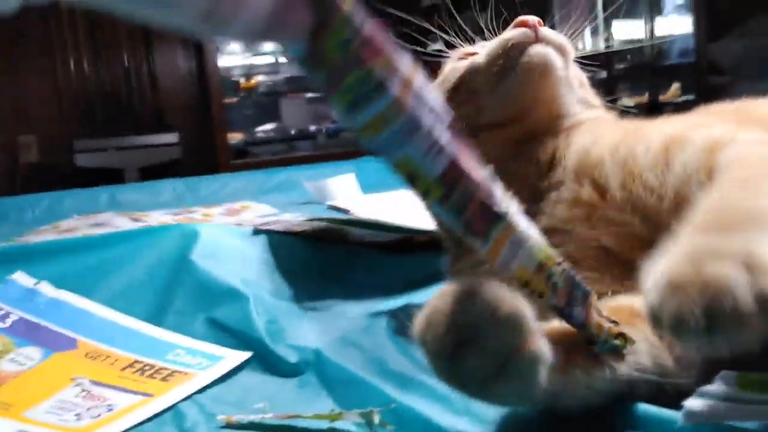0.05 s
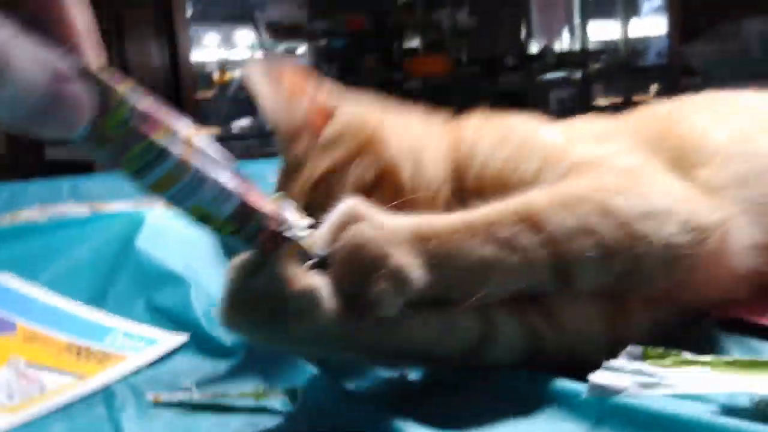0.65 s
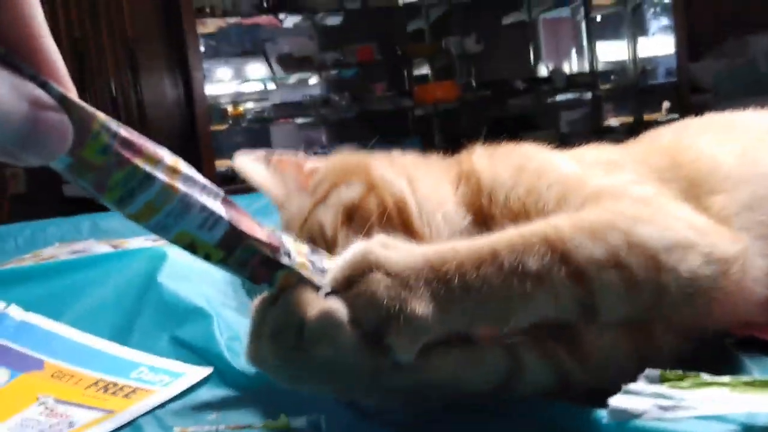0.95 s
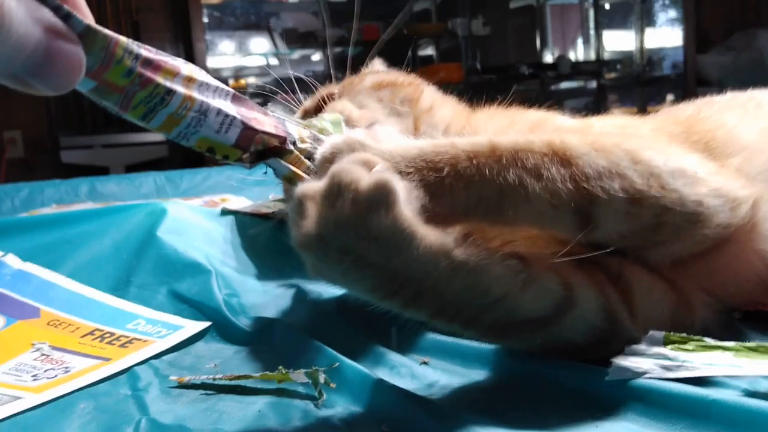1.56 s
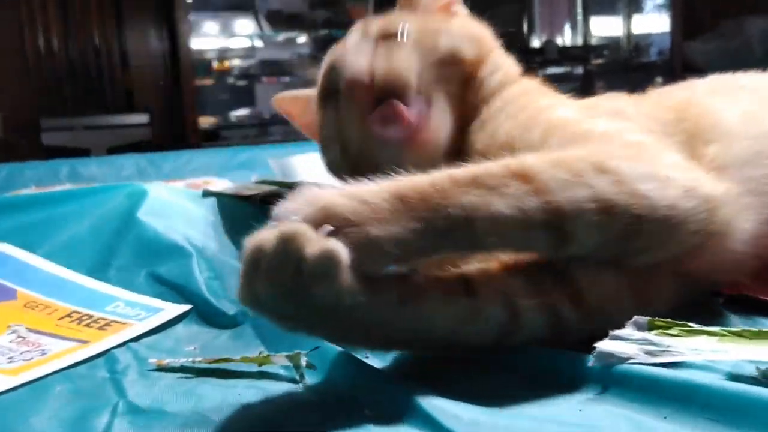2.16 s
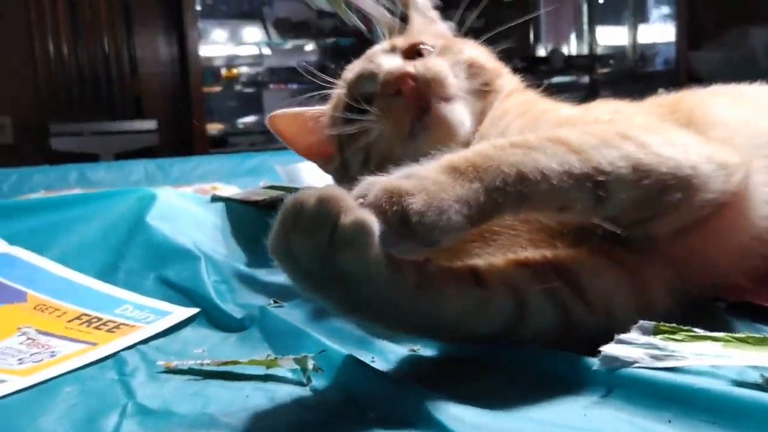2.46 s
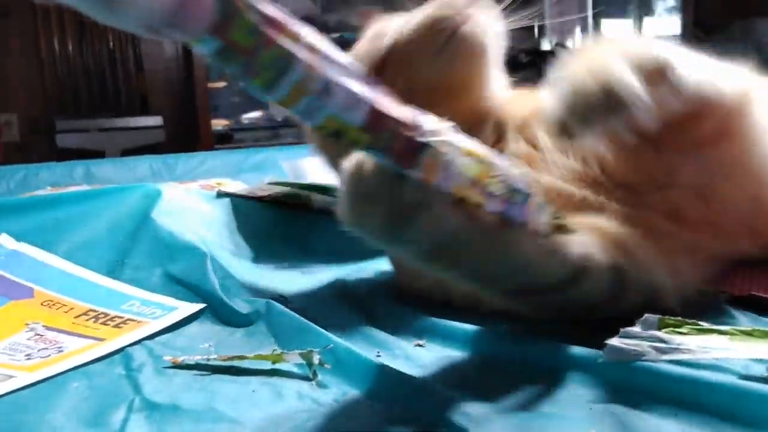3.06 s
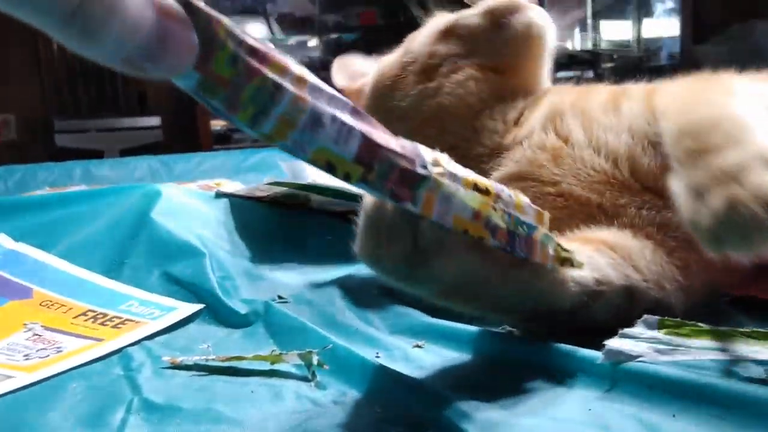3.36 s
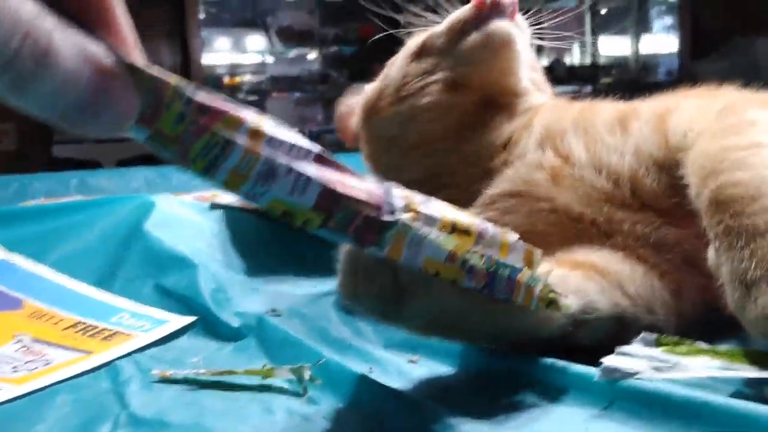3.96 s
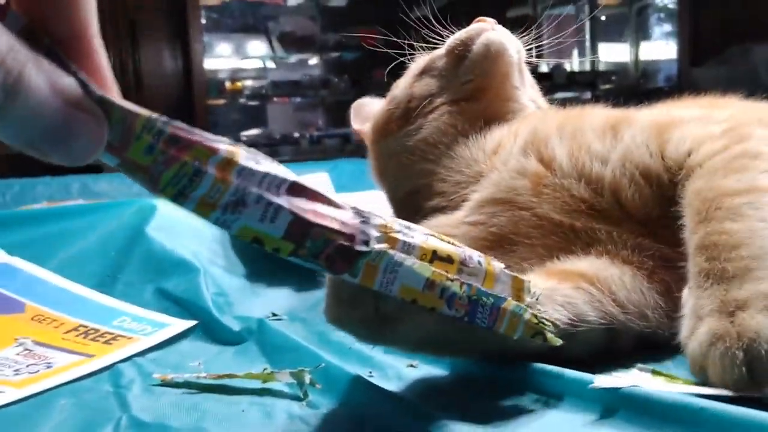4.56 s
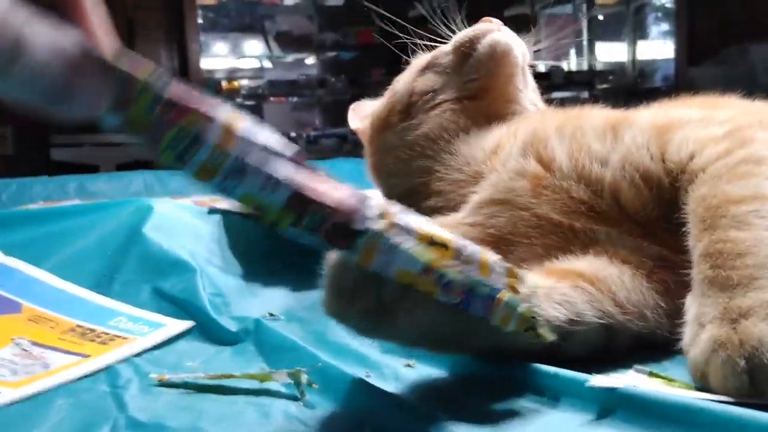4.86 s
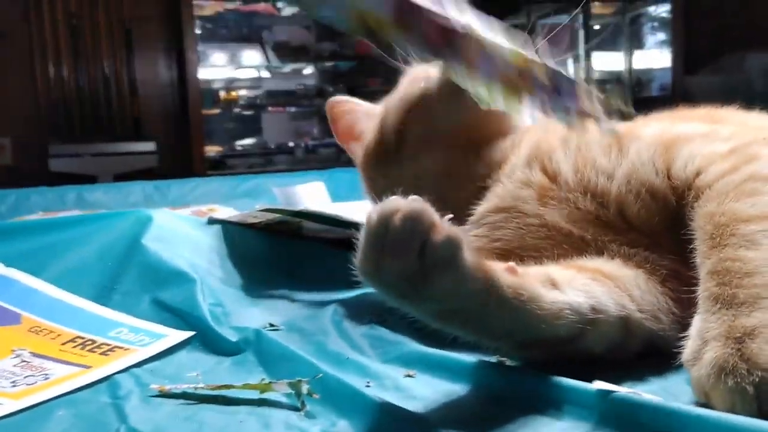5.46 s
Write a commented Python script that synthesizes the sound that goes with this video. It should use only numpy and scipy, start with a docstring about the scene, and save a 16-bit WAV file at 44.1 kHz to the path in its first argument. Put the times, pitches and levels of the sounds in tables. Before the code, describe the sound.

A kitten plays with a rolled newspaper close to the microphone, slightly left, in a furnished room with little echo. A fan drones quietly farther back throughout. At about 0.2 seconds, paws give three quick, soft, hollow knocks, and the paper starts rustling and crinkling in uneven strokes, with snaps at 0.3 and 0.5. A tooth briefly rasps over an edge at 0.7. The loudest snap comes at 1.1 seconds, followed by dense crackling and small dry tocks as teeth and claws dent the roll, busy until about 2.2. After a lull, softer swipes and a few cracks come around 2.7 to 3.2. Then there is only light sliding and faint, scattered ticking. The rustle builds again near 4.8 and ends in a second hard snap at 5.0. The whole sound dips briefly after both hard snaps. Faint rustling continues to the end, at about 5.7 seconds.

```python
"""A furnished room, with a camera's stereo microphone close to a kitten at a rolled newspaper.
As it paws and bites, the sheets slide, crinkle and snap; paws knock the hollow roll, teeth and claws
dent its wall, and one tooth rasps over an edge. Farther back a fan drones. The camera's gain control
ducks after the two hardest snaps, and its stereo widener feeds each channel, late and inverted,
into the other."""
import sys
import numpy as np
from scipy import signal
from scipy.fft import rfft, irfft, next_fast_len
from scipy.io import wavfile
from scipy.ndimage import uniform_filter1d, minimum_filter1d, map_coordinates

SR = 44100
rng = np.random.default_rng(int(sys.argv[2]) if len(sys.argv) > 2 else 0)


def put_to_file(sound):
    """Save the sound as 16-bit audio at rate SR, in the file named by the first command-line argument."""
    columns = np.atleast_2d(sound).T  # one column per channel
    safe = np.clip(columns, -1, 1)
    whole_steps = np.round(safe * 32767)
    wavfile.write(sys.argv[1], SR, whole_steps.astype(np.int16))


N = 251370
TOP_HZ = 14350  # the camera's band limit


def amp(db):
    """Decibels to gain."""
    return 10 ** (np.asarray(db) / 20)


def unit(x):
    """x at rms 1."""
    return x / np.sqrt(np.mean(x ** 2) + 1e-20)


def along(points, hz):
    """(f/Hz, value) points joined on a log frequency axis."""
    freqs, values = np.transpose(points)
    return np.interp(np.log(hz + 1), np.log(freqs + 1), values)


def wobble(rate):
    """A smooth random curve, rate knots a second."""
    return map_coordinates(rng.standard_normal(N // 100), [np.arange(N) * rate / SR], mode="wrap")


def filtered(x, response):
    """x through a filter given as a function of frequency."""
    n = x.shape[-1]
    padded = next_fast_len(2 * n)
    return irfft(rfft(x, padded) * response(np.fft.rfftfreq(padded, 1 / SR)), padded)[..., :n]


def coloured(x, spectrum):
    """x shaped by (f/Hz, level/dB) points, at rms 1."""
    return unit(filtered(x, lambda hz: amp(along(spectrum, hz))))


def resonance(hz, centre, q):
    """Response of one damped mode."""
    return 1j * hz * centre / q / (centre ** 2 - hz ** 2 + 1j * hz * centre / q)


def add(track, start, sound):
    """Mix a sound into the track from start seconds on."""
    part = track[:, max(round(start * SR), 0):][:, :sound.shape[-1]]
    part += sound[..., :part.shape[-1]]


def leaning(x, left_db):
    """A pair with its left channel left_db above its right."""
    return x * amp(np.array([[1], [-1]]) * left_db / 2)


def motor(pitch_hz=123, level_db=-47.5):
    """The fan's motor hums the steady core of its strongest tone."""
    t = np.arange(N) / SR
    phases = rng.uniform(0, 2 * np.pi, (2, 1))
    return np.sqrt(2) * amp(level_db) * np.sin(2 * np.pi * pitch_hz * t + phases)


def fan(air_db=-45.5):
    """Far off: rushing air and unsteady motor tones, diffuse, but more alike at both ports in the bass."""
    # rushing air: f/Hz, level/dB
    air_spectrum = [(20, -29), (32, -26), (55, 3), (100, -5), (160, -2.5), (300, -0.5), (600, -8),
                    (1100, -10.5), (1600, -17), (2200, -15.5), (3000, -30), (4200, -33), (6500, -44.5),
                    (14000, -43)]
    # fan tones: f/Hz, level/dB, half-width/Hz
    tones = [(56.3, -67, 3), (126.3, -51, 9.3), (187.1, -54, 2.2), (232.5, -55, 13), (246.7, -55, 5.7),
             (305.7, -64.5, 2.2), (430.6, -54, 14), (565, -66, 7.8), (599, -67, 5.4), (659.6, -64.5, 10),
             (713, -63, 23)]
    # width of the room sound at the microphone ports: f/Hz, side minus mid/dB
    spread = [(60, -3), (200, -11.5), (400, -9.5), (750, -3), (1300, 0)]
    # its balance: f/Hz, left minus right/dB
    balance = [(60, 0.5), (200, -1), (650, -4.5), (1300, 7), (3000, 4), (10000, -2)]
    # the drone as heard, dipping and recovering, probably partly from the gain control: t/s, level/dB
    heard_level = [(0, -3), (.4, -2), (1.1, -2.5), (1.35, 0.5), (1.6, -1), (1.8, -3), (2, -5.5), (2.3, -4),
                   (2.6, -2.5), (4.9, -3), (5.3, -2.5), (5.7, -3.5)]

    def tone_peaks(f):
        return sum(amp(db) / np.sqrt(width) / (1 + ((f - hz) / width) ** 2) for hz, db, width in tones)

    air = amp(air_db) * coloured(rng.standard_normal((2, N)), air_spectrum)
    hum = np.sqrt(SR / np.pi) * filtered(rng.standard_normal((2, N)), tone_peaks)
    mid, side = air + hum + motor()
    side = filtered(side, lambda hz: amp(along(spread, hz)))
    pair = filtered(np.array([mid + side, mid - side]), lambda hz: leaning(0.9, along(balance, hz)))
    heard_db = np.interp(np.arange(N) / SR, *np.transpose(heard_level))
    return pair * amp(heard_db)


def pawing(attack_s=0.0087, build_db=5):
    """Each stroke takes hold, builds and lets go: amplitudes of sliding on fur, scraping and crushing."""
    # pulls and swipes on the roll: t/s, length/s, release t60/s, slide/dB, crush/dB,
    # share on claws and paper edges rather than fur/0-1
    strokes = [(0.114, 0.085, 0.26, -57.5, -59, .5), (0.197, 0.1, 0.43, -47, -52, 0.2),
               (0.304, 0.059, 0.32, -47, -57, 0.26), (0.438, 0.14, 0.55, -50, -56, 0),
               (0.651, 0.028, 0.3, -47.5, -60, 0.6), (0.735, 0.017, 0.5, -57, -49, 0.5),
               (0.778, 0.034, 0.14, -48, -55, 0.74), (0.815, 0.075, 0.68, -51.5, -58.5, 0.26),
               (0.965, 0.25, 0.12, -47, -52.5, 0.2), (1.111, 0.024, 0.19, -35.5, -43, 0.5),
               (1.208, 0.02, 0.29, -40, -53, 0.2), (1.246, 0.32, 0.28, -51.5, -57.5, 0.55),
               (1.43, 0.062, 0.17, -43, -57.5, 0.77), (1.503, 0.042, 0.033, -39, -46, 0.7),
               (1.608, 0.11, 0.033, -39.5, -50.5, 0.65), (1.73, 0.02, 0.71, -69, -66, 0.9),
               (1.892, 0.031, 0.24, -43, -51.5, 0.36), (1.966, 0.12, 0.28, -49, -53.5, 0.33),
               (2.151, 0.033, 0.14, -52, -56, 0.5), (2.41, 0.027, 0.38, -60, -64, 0.2),
               (2.548, 0.24, .3, -57.5, -63, 0.5), (2.763, 0.093, 0.28, -49, -74, 0.25),
               (2.913, 0.19, 0.4, -49.5, -67, 0.1), (3.156, 0.056, 0.62, -51.5, -79, 0.25),
               (3.787, 0.03, 0.92, -55.5, -67, 0.2), (3.973, 0.25, 0.31, -61, -76, 0.7),
               (4.225, 0.078, 0.22, -54.5, -64, 0.5), (4.62, 0.08, 0.32, -60, -72, .4),
               (4.79, 0.073, .3, -58.5, -78, 0.1), (4.895, 0.17, 0.22, -50.5, -60.5, 0.3),
               (5.14, 0.21, .3, -68, -66, 0.5), (5.376, 0.33, 0.33, -61.5, -66, 0.4),
               (5.456, 0.012, 0.085, -54, -73, 0.5)]

    def powers(slide_db, crush_db, edge):
        return np.array([[1 - edge], [edge], [1]]) * amp([[slide_db], [slide_db], [crush_db]]) ** 2

    t = np.arange(N) / SR
    power = powers(slide_db=-66, crush_db=-67.5, edge=0.27)  # the roll never lies quite still
    for start, length, t60, slide_db, crush_db, edge in strokes:
        grip = np.clip((t - start) / attack_s, 0, 1)
        rise_db = build_db * (np.clip((t - start) / length, 0, 1) - 1)
        release_db = -60 * np.clip((t - start - length) / t60, 0, 2)
        force = grip * amp(rise_db + release_db)
        power = power + powers(slide_db, crush_db, edge) * force ** 2
    return np.sqrt(power)


def crackle(per_s, spread_db, smooth):
    """Fibres letting go: tiny impulses of unequal size over smooth friction."""
    sizes = amp(spread_db * np.minimum(rng.standard_exponential(N), 2))
    slips = (rng.random(N) < per_s / SR) * sizes * rng.uniform(-1.25, 1, (2, N))
    return unit(slips) + smooth * rng.standard_normal((2, N))


def catching(depth_db):
    """Edges, claws and teeth catch and let go: a stuttering gain."""
    return unit(amp(depth_db * np.clip(wobble(150), -2, 2)))


def flexing(x, depth_db):
    """The bending sheet favours ever-changing bands."""
    bands = signal.stft(x, nperseg=256)[2]
    field = uniform_filter1d(rng.standard_normal(bands.shape[1:]), size=9, axis=0)  # over frequency
    field = uniform_filter1d(field, size=12, axis=1)  # over time
    gains = amp(depth_db * np.clip(unit(field), -2, 2))
    return signal.istft(bands * gains, nperseg=256)[1][:, :N]


def rustle(fur, edges, squeeze, slide_gain_db=-4, crush_gain_db=-1):
    """Sliding sheets hiss finely; squeezed ones crunch lower and coarser. Both move in small jerks."""
    # paper sliding on fur: f/Hz, level/dB
    swish_spectrum = [(300, -34), (1500, 8.5), (3300, -2), (6000, -7), (7800, 5.5), (9500, 8), (11000, 5.5),
                      (12500, -2), (14000, -1.5)]
    # paper scraping on claws and edges: f/Hz, level/dB
    scrape_spectrum = [(300, -61), (1500, -6), (3300, -12), (6000, -0.5), (7800, 5), (11000, -11.5),
                       (12500, 5), (14000, 1)]
    # squeezed sheets: f/Hz, level/dB
    crush_spectrum = [(100, -41), (400, 1.5), (1000, -2.5), (1600, 3.5), (2400, -5), (3400, -1),
                      (5000, -9.5), (7000, -9), (14000, -38)]
    jerks_db = 0.64 * wobble(50)
    scrape_grit = crackle(per_s=800, spread_db=4.5, smooth=0.4)
    crush_grit = crackle(per_s=1200, spread_db=3.5, smooth=0.9)
    catches = catching(depth_db=2.5)
    swish = fur * coloured(rng.standard_normal((2, N)), swish_spectrum)  # fur does not catch
    scrape = edges * catches * coloured(scrape_grit, scrape_spectrum)
    slide = amp(slide_gain_db + jerks_db) * (swish + scrape)
    crush = squeeze * amp(crush_gain_db + jerks_db) * catches * coloured(crush_grit, crush_spectrum)
    return flexing(leaning(slide, left_db=3.5) + crush, depth_db=2.5)


def buckling(creases, rise_s=0.00056, fall_s=0.00023, shiver_db=-25, shiver_t60=0.04):
    """Each crease buckles in about a millisecond: a crack, a bite and a pop, then the sheet shivers."""
    # bright crack of the crease: f/Hz, level/dB
    crack_spectrum = [(1000, -9), (3300, -2), (5600, -8.5), (7600, 7.5), (11000, 7), (13500, 1)]
    # bite of the stiff fold: f/Hz, level/dB
    bite_spectrum = [(1200, -32), (2400, -8.5), (3200, 2), (4000, -0.5), (5500, -12), (9000, -7.5)]
    # pop of the sheet: f/Hz, level/dB
    pop_spectrum = [(200, 9), (900, 18), (1600, 11.5), (2200, 21.5), (3300, -25), (6000, -26), (14000, -33)]
    out = np.zeros((2, N))
    t = np.arange(-SR // 200, SR // 25) / SR
    after = np.maximum(t, 0)
    shiver = amp(shiver_db - 60 * after / shiver_t60)
    burst = np.exp(np.minimum(t, 0) / rise_s) * (np.exp(-after / fall_s) + shiver)
    for start, db, pitch_hz, pop_db, bite_db in creases:
        tear = burst * rng.standard_normal((2, len(t)))
        fold, push = burst * rng.standard_normal((2, len(t)))  # the lower parts reach both ports alike
        pitched = filtered(tear, lambda hz: resonance(hz, pitch_hz, q=1.3) * (hz < TOP_HZ))
        crack = coloured(pitched, crack_spectrum)
        bite = amp(bite_db) * coloured(fold, bite_spectrum)
        pop = amp(pop_db) * coloured(push, pop_spectrum)
        snap = crack + bite + pop
        add(out, start + t[0], amp(db) * snap / abs(snap).max(axis=1, keepdims=True))
    return leaning(out, left_db=4)


def crinkles(slide, per_s=30, level_db=-44, at_slide_db=-45.5, growth=0.87, scatter_db=2):
    """Small creases give way at random, louder as the paper slides harder."""
    gap_a, gap_b, strength, pitch, pop = rng.standard_normal((512, 5)).T
    times = np.cumsum((gap_a ** 2 + gap_b ** 2) / 2) / per_s  # exponential waits
    slide_db = 20 * np.log10(np.interp(times, np.arange(N) / SR, slide))
    db = level_db + growth * (slide_db - at_slide_db) + scatter_db * strength
    pitch_hz = 8550 * 2 ** (0.28 * pitch)
    pop_db = -2 + scatter_db * pop
    bite_db = np.full_like(db, -21.5)
    creases = np.column_stack([times, db, pitch_hz, pop_db, bite_db])
    return buckling(creases[times < N / SR])


def knocks(attack_s=0.00077, side_db=-9):
    """A soft paw sets the hollow roll ringing for a moment."""
    # paws landing: t/s, level/dB, stiffness of the spot/pitch ratio
    landings = [(.1612, -26, 1.02), (.189, -31.5, 1.06), (.2105, -29, 0.97)]
    # modes of the roll: f/Hz, level/dB, t60/s
    roll_modes = [(169, 7.5, 0.023), (304, -1, 0.038), (435, 1.5, 0.064), (580, -5.5, 0.049),
                  (910, -10, 0.035), (1100, -13, 0.025)]
    out = np.zeros((2, N))
    t = np.arange(SR // 8) / SR
    hz, mode_db, t60 = np.transpose(roll_modes)[:, :, None]
    onset = 1 - np.exp(-t / attack_s)
    for start, db, stiffness in landings:
        phases = rng.uniform(0, 2 * np.pi, (2, len(roll_modes), 1))
        decay = amp(mode_db - 60 * t * stiffness / t60)
        modes = decay * np.sin(2 * np.pi * hz * stiffness * t + phases)
        mid, side = modes.sum(axis=1) * onset * amp([[0], [side_db]])
        add(out, start, amp(db) * np.array([mid + side, mid - side]) / 2)
    return out


def snaps():
    """The big creases give way, close to the microphone."""
    # big creases: t/s, level/dB, f/Hz, pop against crack/dB, bite against crack/dB
    creases = [(.1615, -28, 9400, 10, 10), (.1892, -29, 9300, 14, 7), (.2088, -34.5, 8000, 3, 21),
               (.3196, -23, 10500, 3.5, 11), (.5404, -24, 9400, -4, -16), (.667, -34, 7500, -6, -8),
               (.678, -39, 8500, -9, -9), (.698, -43, 9000, -11, -13), (.7142, -34, 8300, -9, -21),
               (.7365, -42, 7000, 8, 2), (.809, -34, 9000, -7, -5), (.816, -41, 8500, -3, -7),
               (1.08, -31, 7500, -3, -16), (1.091, -30, 11500, 1, -19), (1.1064, -10, 11800, -10, -7.5),
               (1.12, -29, 8500, -13, -10), (1.1334, -20, 7600, -7, -2), (1.139, -26, 8500, -11, -6),
               (1.157, -27, 7500, -4, 2), (1.165, -34, 8500, -20, -9), (1.1796, -21.5, 10000, -13, -20),
               (1.188, -26, 10000, -8, -17), (1.331, -38, 7000, -3, 2), (1.474, -36, 8500, -16, -9),
               (1.4878, -24.5, 8500, -9, -5), (1.515, -26.5, 8500, 5, -12), (1.527, -30, 8500, 11, -8),
               (1.5385, -24, 8150, -16, -7), (1.543, -40, 8000, -2, -8), (1.6045, -33.5, 8000, -12, -5),
               (1.624, -35, 8000, -13, -12), (1.635, -32, 8500, -1, -15), (1.652, -36, 8500, 6, -18),
               (1.7093, -32, 7150, -5, -4), (1.7178, -34.5, 7400, 1, -10), (1.725, -25.5, 7740, -8, -12),
               (1.8723, -23, 9000, -7, -11), (1.878, -38, 9000, -8, -21), (1.9, -32, 9500, -1, -15),
               (1.909, -30.5, 8000, -8, -20), (2.037, -44, 7500, -1, 10), (2.1362, -38, 7200, -2, 0),
               (2.169, -36, 6500, 5, 10), (2.68, -44, 8000, -9, -18), (2.782, -40, 7800, -12, -20),
               (2.8254, -27, 6400, -10, -12), (2.9665, -32.5, 5200, 7, 1), (3.107, -41, 9500, -12, -9),
               (3.116, -38.5, 7000, -10, -7), (3.402, -46.5, 9500, -12, -16), (3.4538, -42, 9800, -9, -20),
               (3.545, -49, 9500, -12, -14), (3.646, -41.5, 10300, -6, -17), (3.74, -47, 10000, -12, -14),
               (3.876, -49, 10000, -14, -14), (3.89, -41, 10000, -14, -16), (4.027, -44, 10200, -12, -12),
               (4.135, -44.5, 9500, -12, -18), (4.248, -37.5, 9500, -10, -16), (4.865, -44, 9000, -12, -14),
               (4.91, -40, 9500, -12, -17), (4.923, -43, 9500, -12, -14), (4.972, -38.5, 7500, -4, 11),
               (4.9953, -15, 7800, -12, -14.5)]
    return buckling(creases)


def dents(t60_cycles=4.8):
    """The wall of the roll flips inward with one dry, heavily damped tock."""
    # teeth and claws denting the wall: t/s, level/dB, f/Hz
    tocks = [(.3198, -32, 470), (.7365, -35, 1120), (1.157, -27, 816), (1.5378, -25, 910),
             (1.6036, -28, 680), (1.7088, -25, 1080), (1.7173, -29, 1070), (2.9662, -30, 810),
             (2.9754, -27, 1260), (3.641, -45, 900), (4.9948, -31, 1050)]
    out = np.zeros((2, N))
    t = np.arange(SR // 30) / SR
    for start, db, pitch_hz in tocks:
        tock = amp(-60 * t * pitch_hz / t60_cycles) * np.sin(2 * np.pi * pitch_hz * t)
        add(out, start, amp(db) * tock)
    return leaning(out, left_db=1)


def rasp(start_s=0.68, level_db=-45, attack_s=0.0076, t60=0.3):
    """A tooth drags over a taut edge of the paper: a short, narrow, stuttering rasp."""
    # tooth on the edge: f/Hz, level/dB
    spectrum = [(1500, -25), (2600, 1), (3300, -1), (4200, -12), (5600, -24), (8000, -28)]
    t = np.maximum(np.arange(N) / SR - start_s, 0)
    pull = np.minimum(t / attack_s, 1) * amp(level_db - 60 * t / t60)
    catches = catching(depth_db=3)
    grit = crackle(per_s=1200, spread_db=-2, smooth=0.5)
    return pull * catches * coloured(grit, spectrum)


def room(x, wet_db=-19, t60=0.28, delay_s=0.004):
    """The close sound, with a short, faint answer from the furnished room."""
    t = np.arange(SR // 3) / SR
    tail = rng.standard_normal((2, len(t))) * amp(-60 * t / t60) * (t > delay_s)
    tail /= np.linalg.norm(tail[0])
    return x + amp(wet_db) * signal.fftconvolve(x, tail, axes=1)[:, :N]


def scene():
    """Paper and paws close to the microphone and a little left, the fan behind."""
    fur, edges, squeeze = pawing()
    behind = fan()
    slide = np.hypot(fur, edges)
    paper = rustle(fur, edges, squeeze) + rasp() + knocks() + dents() + snaps() + crinkles(slide)
    return room(paper) + behind


def gain_control(x, ceiling_db=-16.5, hold_s=0.32, recover_db_per_s=27):
    """A peak over the ceiling pulls the gain down at once; it holds, then climbs back."""
    peak_db = 20 * np.log10(abs(x).max(axis=0) + 1e-9)
    excess_db = np.maximum(peak_db - ceiling_db, 0)
    half_hold = int(hold_s * SR) // 2
    held_db = -minimum_filter1d(-excess_db, 2 * half_hold + 1, origin=half_hold)
    climb_db = recover_db_per_s * np.arange(N) / SR
    cut_db = np.maximum.accumulate(held_db + climb_db) - climb_db
    gain_db = uniform_filter1d(minimum_filter1d(-cut_db, size=65), size=65)  # ramps in just ahead
    return x * amp(gain_db)


def widener(x, lag_s=0.000475):
    """Each channel is fed, late and inverted, into the other."""
    # feed between the channels: f/Hz, share/0-1
    crossfeed = [(200, 0.49), (1000, 0.6), (4500, 0.97), (6200, 0.5), (8000, 0.099), (12000, 0.034)]
    return x - filtered(x[::-1], lambda hz: along(crossfeed, hz) * np.exp(-2j * np.pi * hz * lag_s))


def record(dry):
    """From the microphone through the camera's gain control, stereo widener and band limit."""
    return filtered(widener(gain_control(dry)), lambda hz: hz < TOP_HZ)


dry = scene()
out = record(dry)
put_to_file(out)
```